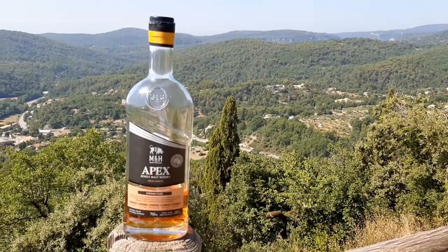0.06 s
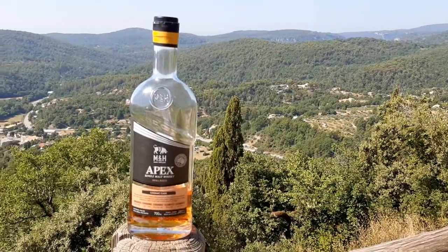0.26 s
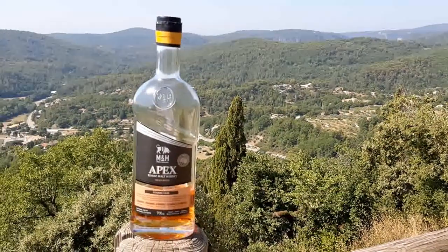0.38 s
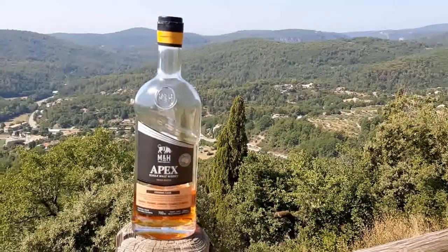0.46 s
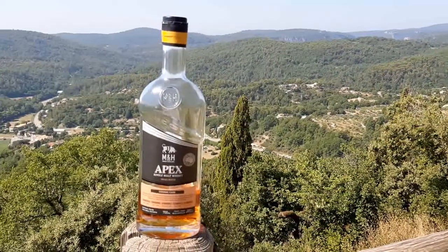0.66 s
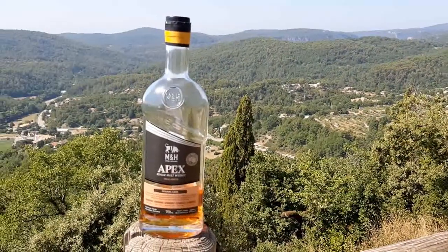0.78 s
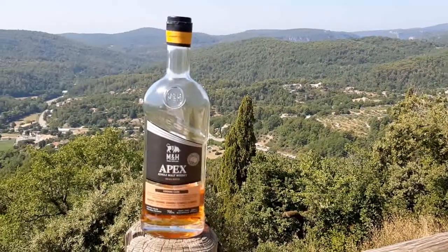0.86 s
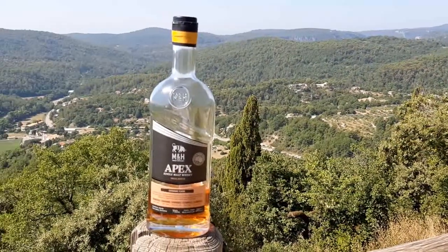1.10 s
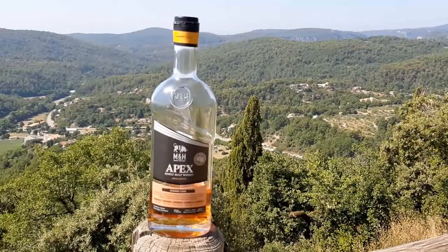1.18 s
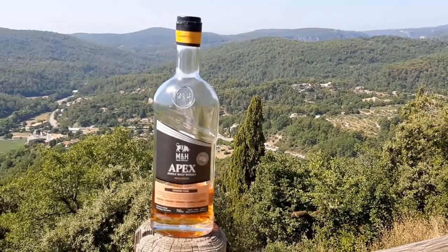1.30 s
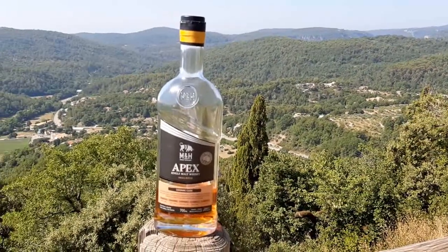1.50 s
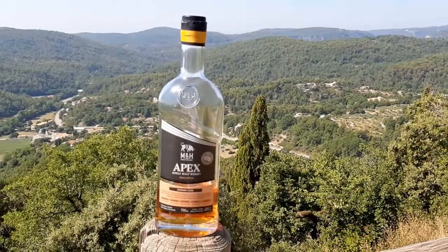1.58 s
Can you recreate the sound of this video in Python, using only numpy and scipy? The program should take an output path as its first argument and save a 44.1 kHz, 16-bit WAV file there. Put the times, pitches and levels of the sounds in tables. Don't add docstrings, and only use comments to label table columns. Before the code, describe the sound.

One nearby cicada sings short raspy bursts, about six per second, throughout. Low gusts buffet the mono microphone mainly in the first half, with soft leaf hiss, a faint far chorus and tiny dry ticks on an open hillside.

```python
import sys
import numpy as np
from scipy import signal
from scipy.fft import rfft, irfft
from scipy.io import wavfile
from scipy.ndimage import uniform_filter1d

SR = 44100
rng = np.random.default_rng(int(sys.argv[2]) if len(sys.argv) > 2 else 0)


def int16_out(signal):
    q = np.round(np.clip(np.atleast_2d(signal).T, -1, 1) * 32767)
    wavfile.write(sys.argv[1], SR, q.astype(np.int16))


def rack_gain(trim_db):
    fader = np.asarray(trim_db, float)
    return 10 ** (fader / 20)


N = 72765

# pitch_hz, level_db (per Hz)
AIR_SPECTRUM = [(150, -51), (300, -14.5), (550, -24), (1200, -20), (1800, -25), (2400, -21.5),
                (7000, -22.5), (15500, -26)]
# start_s, level_db (over the still air)
LEAF_RUSTLE = [
    (0, 4),
    (.17, 2.5),
    (.25, 4),
    (.42, 3.5),
    (.63, 1.2),
    (.75, 5),
    (.95, 1.6),
    (1.65, 2),
]
# start_s, level_db
GUST_LEVEL = [(0.0, -48.5), (0.182, -43.5), (0.26, -27), (0.298, -19.5), (0.344, -34), (0.38, -26.5),
              (0.408, -29), (0.614, -39.5), (0.694, -25.5), (0.72, -33.5), (0.766, -23.5), (0.804, -41),
              (1.056, -59.5), (1.272, -40.5), (1.296, -37), (1.478, -44.5), (1.502, -32.5), (1.65, -58)]
# pitch_hz, level_db (per Hz)
BUFFET_SPECTRUM = [(20, 9), (32, -10), (42, -2), (65, -0.5), (80, -1), (130, -18.5), (220, -41.5),
                   (500, -66)]
# start_s, level_db
FLUTTER_LEVEL = [(0.0, -66), (0.072, -75), (0.16, -57.5), (0.192, -61), (0.228, -51.5), (0.248, -48.5),
                 (0.298, -54.5), (0.376, -56), (0.398, -56.5), (0.596, -64), (0.628, -79), (0.674, -43),
                 (0.872, -66.5), (1.102, -79.5), (1.354, -54.5), (1.506, -56), (1.604, -75.5), (1.65, -73)]
# pitch_hz, level_db (per Hz)
FLUTTER_SPECTRUM = [(80, -15.5), (125, -2), (200, -8.5), (300, -21.5), (480, -29), (700, -50)]
# centre_s, level_db, pitch_hz, length_s
EDDIES = [(0.137, -42.5, 52.7, .02), (0.208, -33, 52, 0.02), (0.243, -36, 134, 0.0043),
          (0.2538, -20, 60.4, 0.012), (0.387, -27.5, 56, 0.0089), (.675, -53.5, 255, 0.0094),
          (0.679, -42, 119, 0.0055), (0.688, -27.5, 57.4, 0.01), (.76, -27.5, 56.4, 0.017),
          (.825, -40.5, 56, 0.014), (0.887, -43.5, 52.3, 0.0073), (1.3, -39.5, 86.8, 0.014),
          (1.336, -43, 56.4, 0.035), (1.511, -42.5, 56, .015)]
# start_s, level_db, pitch_hz, t60_s
TICKS = [(.004, -58, 1000, .12), (.59, -61, 960, .08), (.592, -63, 810, .07), (.7445, -53, 1600, .005),
         (.7483, -47, 1500, .003), (.7484, -43, 3300, .002), (.74845, -40, 5800, .002),
         (.7675, -55, 1800, .006), (.8028, -46.5, 3800, .016), (.804, -44, 5800, .002),
         (.8285, -47, 2200, .004)]
PHRASE_STARTS = [.0043, .1643, .3233, .5, .6698, .8383, 1.0138, 1.1848, 1.3468, 1.5156]
# length_s, level_db
PHRASES = [(0.083, -47.5), (0.081, -46), (0.091, -45), (0.084, -46), (0.085, -45.5), (0.09, -47.5),
           (0.083, -48), (.078, -49.5), (0.086, -48.5), (0.079, -47.5)]
# pitch_hz, level_db, t60_s
LOW_MODES = [
    (4320, -7.5, 0.011),
    (4550, -3.5, 0.011),
    (4740, -1, 0.012),
    (5077, 0, 0.011),
    (2500, -24, 0.012),
]
# pitch_hz, level_db, t60_s
HIGH_MODES = [
    (5440, -3, 0.013),
    (5595, 0, 0.016),
    (5946, -4, 0.013),
    (6310, -7.5, 0.0057),
    (7080, -9, 0.0087),
    (7550, -9, 0.0078),
]


def unit(x):
    return x / np.sqrt(np.mean(x ** 2))


def coloured(points):
    hz, db = np.array(points, float).T
    f = np.maximum(np.arange(N // 2 + 1) * SR / N, 1)
    gain = rack_gain(np.interp(np.log(f), np.log(hz), db))
    return unit(irfft(rfft(rng.standard_normal(N)) * gain, N))


def band(x, hz, width_hz):
    f = np.arange(N // 2 + 1) * SR / N
    return irfft(rfft(x) * np.exp(-.5 * ((f - hz) / (width_hz / 2)) ** 2), N)


def walk(rate_hz):
    k = int(SR / rate_hz)
    return unit(uniform_filter1d(uniform_filter1d(rng.standard_normal(N), k), k))


def curve(rows):
    s, v = np.array(rows, float).T
    return np.interp(np.arange(N) / SR, s, v)


def steady(x):
    swing = uniform_filter1d(np.abs(signal.hilbert(x)), int(0.0095 * SR))
    return unit(x / (swing + 0.36) ** 0.25)


def decay(t, t60_s):
    return np.exp(-np.log(1000) * t / t60_s)


def ring(hz, t60_s, size=4096):
    t = np.arange(size) / SR
    return np.sin(2 * np.pi * hz * t) * decay(t, t60_s)


def strike(when_s, db, modes):
    clicks = np.zeros(N + 1)
    place = np.clip(when_s * SR, 0, N - 1)
    i, fraction = place.astype(int), place % 1
    np.add.at(clicks, i, rack_gain(db) * (1 - fraction))
    np.add.at(clicks, i + 1, rack_gain(db) * fraction)
    response = np.zeros(4096)
    for k, (hz, mode_db, t60_s) in enumerate(modes):
        response += (-1) ** k * rack_gain(mode_db) * ring(hz, t60_s)
    return signal.fftconvolve(clicks, response)[:N]


def chorus():
    blur = unit(band(rng.standard_normal(N), 5330, 1620))
    return rack_gain(-68.5 + 0.4 * walk(5.1)) * blur


def air():
    hiss = coloured(AIR_SPECTRUM)
    patchy = hiss.copy()
    for hz in 400 * 2 ** (np.arange(8) / 2):
        patchy += (rack_gain(1.3 * walk(5)) - 1) * band(hiss, hz, hz / 3)
    return rack_gain(-63.5 + curve(LEAF_RUSTLE) + .3 * walk(30)) * patchy


def road():
    hum = unit(band(rng.standard_normal(N), 995, 480))
    fade_s = 0.32
    return rack_gain(-69) * hum * np.exp(-np.arange(N) / SR / fade_s)


def wind():
    bed_db, ceiling_db = -5, -33
    buffet_db = np.minimum(bed_db + curve(GUST_LEVEL), ceiling_db)
    out = rack_gain(buffet_db) * steady(coloured(BUFFET_SPECTRUM))
    out = out + rack_gain(curve(FLUTTER_LEVEL)) * steady(coloured(FLUTTER_SPECTRUM))
    t = np.arange(N) / SR
    for centre_s, db, hz, length_s in EDDIES:
        swell = np.exp(-.5 * ((t - centre_s) / length_s) ** 2)
        out = out + rack_gain(db) * 1.79 * np.sin(2 * np.pi * hz * (t - centre_s)) * swell
    return out


def ticks():
    out = np.zeros(N + 4096)
    for start_s, db, hz, t60_s in TICKS:
        i = int(max(start_s, 0) * SR)
        out[i:i + 4096] += rack_gain(db) * ring(hz, t60_s)
    return out[:N]


def slope_echo(near):
    t = np.arange(N // 4) / SR
    onset = np.minimum(t / 0.0022, 1)
    slope = rng.standard_normal(len(t)) * decay(t, 0.27) * onset
    slope = slope / np.sqrt(np.sum(slope ** 2))
    return rack_gain(-6.5) * band(signal.fftconvolve(near, slope)[:N], 5000, 7200)


def cicada():
    drum_hz, second_drum, first_gap_s = 109.7, .42, .0069
    rib_s, jitter_s, rib_jitter_s, scatter_db = .0018, .00015, .00004, 1.8
    length_s, phrase_db = np.array(PHRASES).T[:, :, None, None]
    start_s = np.array(PHRASE_STARTS)[:, None, None]
    click, rib = np.arange(40)[:, None], np.arange(3)
    chance = rng.standard_normal((len(PHRASES), 40, 3, 4))

    cycle = (click - 1) // 2 + second_drum * ((click - 1) % 2)
    at_s = np.where(click > 0, first_gap_s + cycle / drum_hz, 0)
    when_s = start_s + at_s + rib_s * rib
    when_s = when_s + jitter_s * chance[..., :1, 0] * (click > 0) + rib_jitter_s * chance[..., 3]

    def phrase_shape(attack_db, hold_s):
        swell_s, fade_s = 0.01, 0.0077
        swell_db = attack_db * np.exp(-at_s / swell_s)
        return phrase_db + swell_db - 10 * np.maximum(at_s - hold_s, 0) / fade_s

    low_db = phrase_shape(-0.5, length_s) - 14 * rib + scatter_db * chance[..., 1]
    high_db = -5 + phrase_shape(-9, length_s + 0.0058) - 6 * rib + scatter_db * chance[..., 2]
    near = strike(when_s, low_db, LOW_MODES) + strike(when_s + rib_s, high_db, HIGH_MODES)
    return near + slope_echo(near)


def scene():
    return (chorus() + air() + road() + wind() + ticks() + cicada())[None]


def roll_off(x):
    return signal.sosfilt(signal.butter(12, 16340, fs=SR, output="sos"), x)


def record(dry):
    return roll_off(dry)


dry = scene()
out = record(dry)
int16_out(out)
```